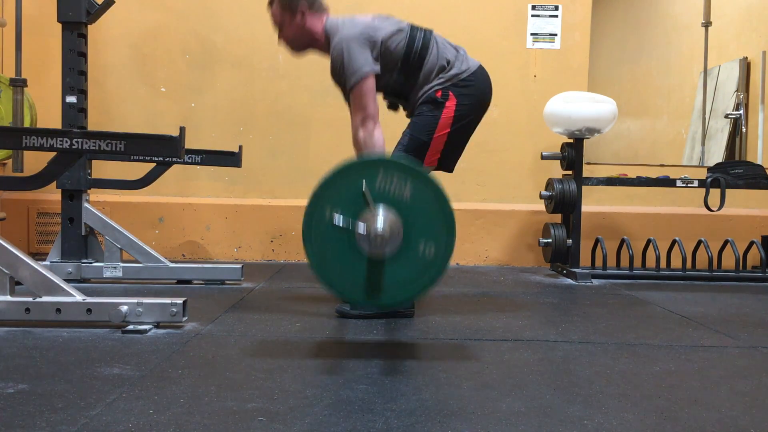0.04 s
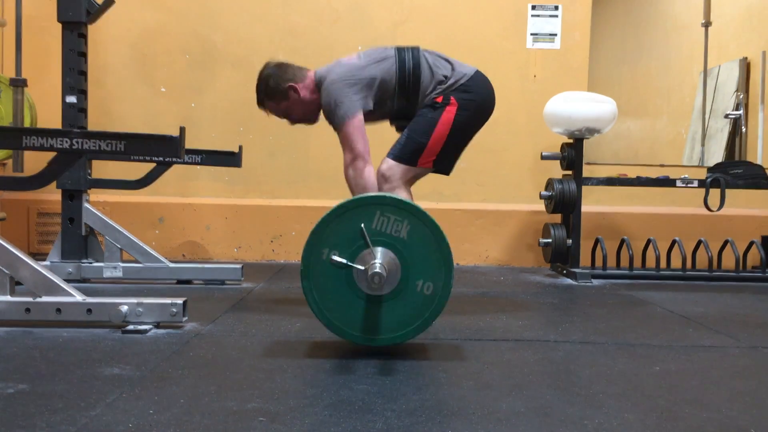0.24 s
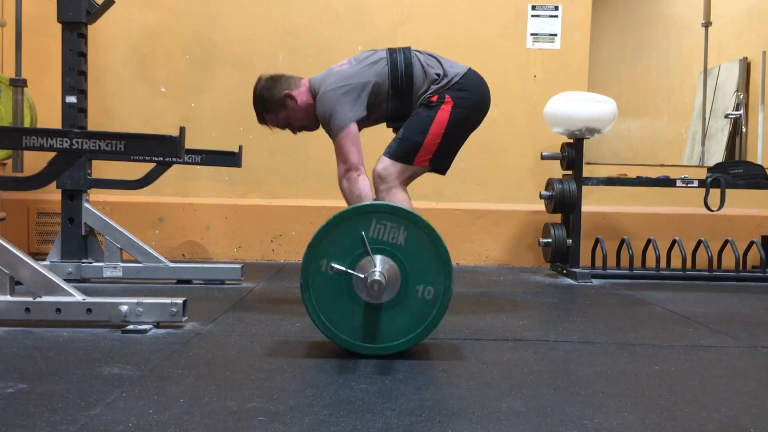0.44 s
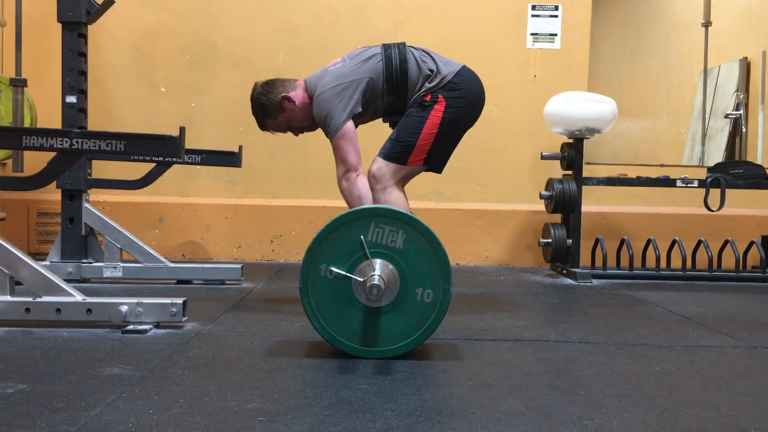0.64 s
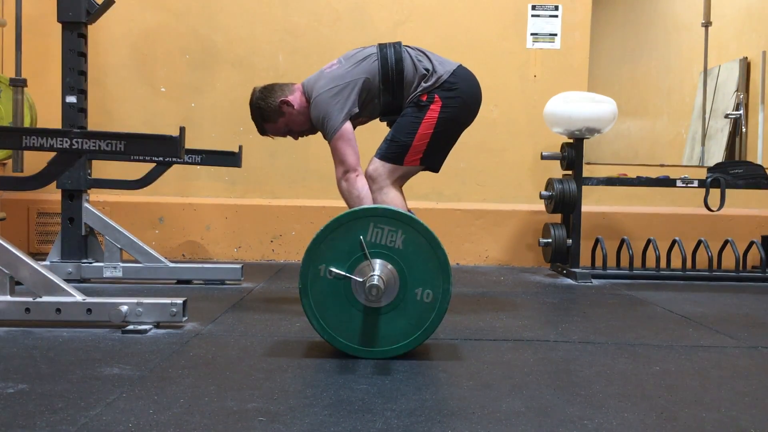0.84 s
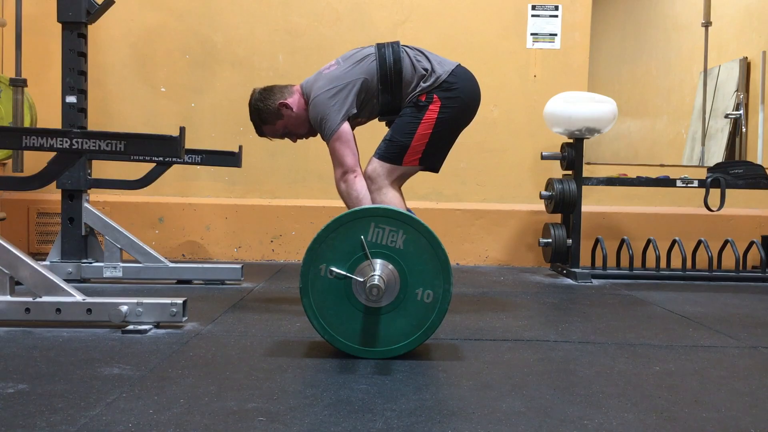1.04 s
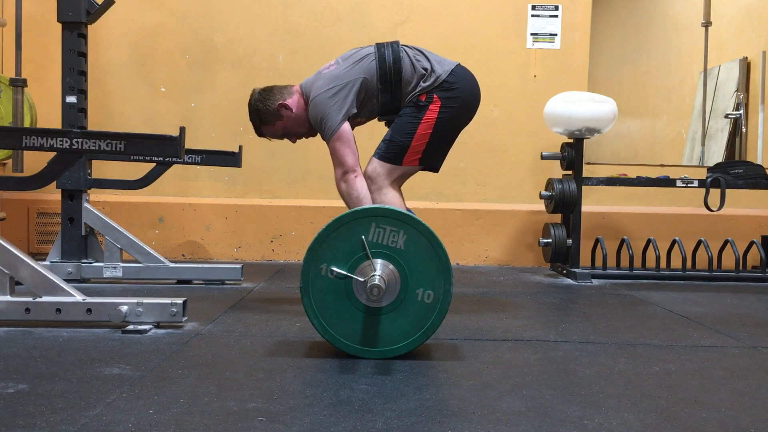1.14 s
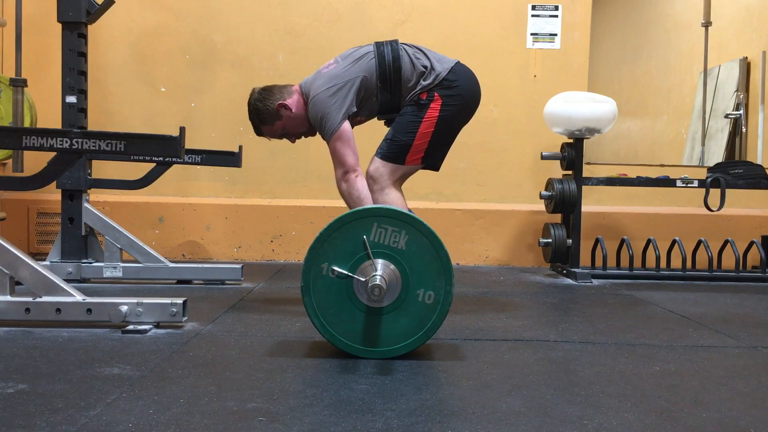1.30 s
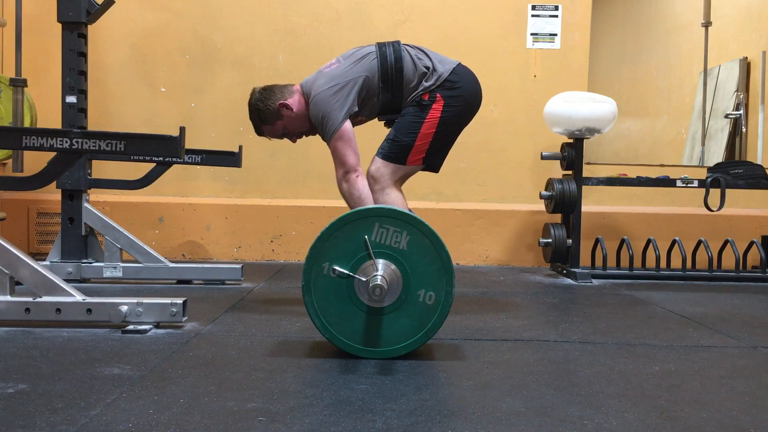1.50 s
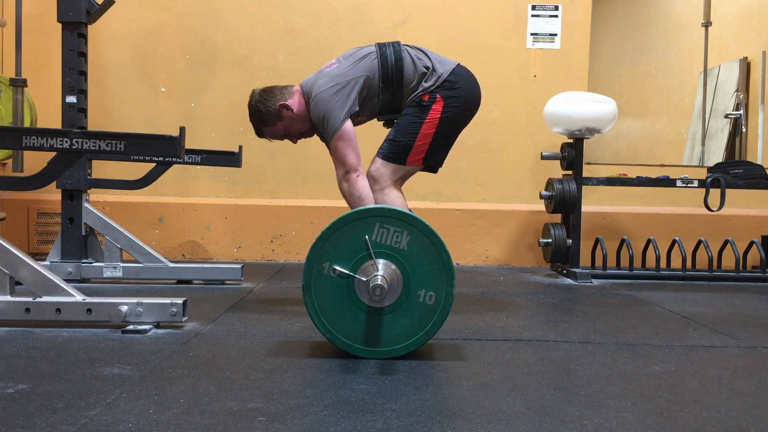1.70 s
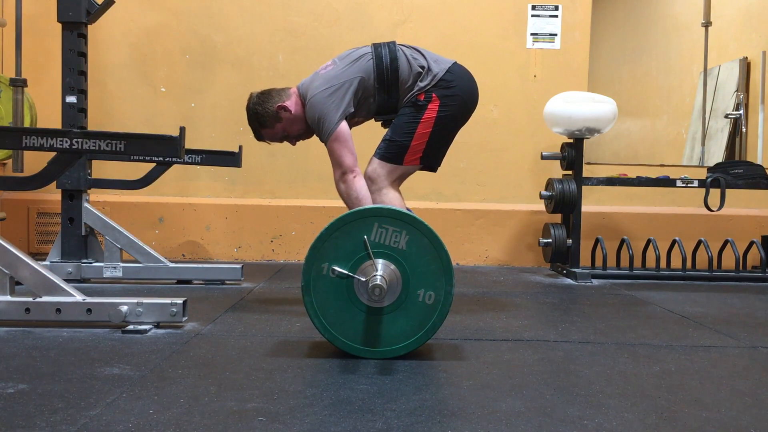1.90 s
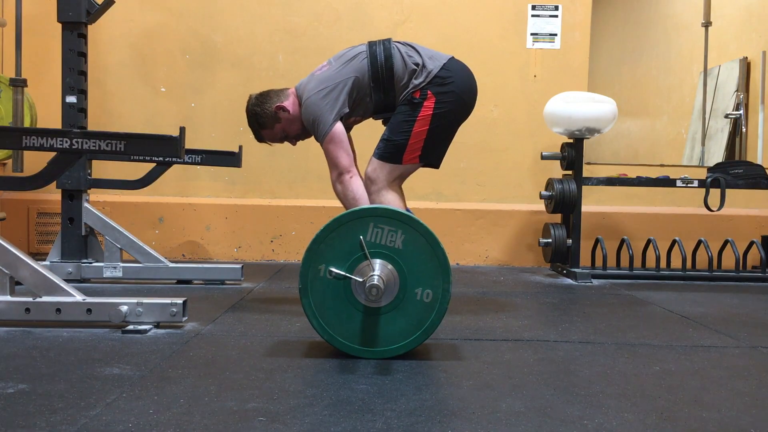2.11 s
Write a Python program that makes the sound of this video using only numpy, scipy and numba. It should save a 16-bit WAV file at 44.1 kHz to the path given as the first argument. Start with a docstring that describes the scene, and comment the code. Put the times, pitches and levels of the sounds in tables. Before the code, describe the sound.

A barbell slams onto floor mats, its rubber plates rattling as a large gym reverberates.

```python
"""A large gym, one microphone within direct earshot of a barbell dropped on the matted floor.
The rubber plates touch down one after another and rattle on their sleeves; plates and bar ring, the hall
reverberates and its lowest modes boom on, beating. Dull knocks and faint rustles follow as the load
settles. Ventilation rumbles underneath, and the recorder's limiter holds the blow down."""
import sys
import numpy as np
from scipy import signal
from scipy.fft import rfft, irfft
from scipy.io import wavfile
from numba import njit

SR = 44100
rng = np.random.default_rng(int(sys.argv[2]) if len(sys.argv) > 2 else 0)


def bounce(signal):
    """Save signal as a 16-bit WAV file at the path given by the first command-line argument."""
    frames = np.transpose(np.atleast_2d(signal))
    limited = np.clip(frames, -1, 1)
    pcm = np.round(limited * 32767).astype(np.int16)
    wavfile.write(sys.argv[1], SR, pcm)


N = 94815
TIME, BIN_HZ = np.arange(N) / SR, np.arange(N // 2 + 1) * SR / N
CONTACT_RISE_S = 0.00034


def undb(db):
    """Decibels to amplitude."""
    return 10 ** (np.asarray(db) / 20)


def along(hz, points, column=1):
    """One column of a table, read on a log-frequency axis."""
    table = np.array(points, float)
    return np.interp(np.log(hz + 1e-3), np.log(table[:, 0]), table[:, column])


def noise(db):
    """Noise of rms 1 with the given relative level at each frequency."""
    x = irfft(undb(db) * np.exp(2j * np.pi * rng.random(len(BIN_HZ))), N)
    return x / x.std()


def rise(seconds, start=0):
    """A smooth onset."""
    return 1 - np.exp(-(np.maximum(TIME - start, 0) / seconds) ** 2)


def fade(t60, start=0):
    """Silence, then an exponential decay of 60 dB in t60 seconds."""
    return (TIME >= start) * np.exp(-np.log(1000) * np.maximum(TIME - start, 0) / t60)


def ventilation():
    """Room tone: the steady noise of moving air."""
    # air spectrum: f/Hz, relative level/dB
    colour = [(25, -19), (50, 4), (80, 1.5), (130, -9), (220, -15), (380, -16), (550, -25.5), (1200, -23.5),
              (2500, -30.5), (5000, -39), (9000, -49.5), (15000, -58)]
    return undb(-50) * noise(along(BIN_HZ, colour))


def rumble():
    """A low rumble, already in the hall, dies away."""
    # rumble spectrum: f/Hz, relative level/dB
    colour = [(25, -27), (50, -12), (78, 1), (105, -8), (150, -19), (400, -30), (2000, -63.5)]
    return undb(-37.5) * noise(along(BIN_HZ, colour)) * fade(t60=2.2)


def ring_db():
    """The lift that the barbell's resonances give to each frequency."""
    # rubber plates (low, broad) and steel bar (high, narrow): f/Hz, width/Hz, lift/dB
    resonances = [(300.2, 138, 15.5), (555.3, 113, 10), (640, 99, 7), (750, 5.3, 4), (846, 4.7, 10.5),
                  (937, 60, 6.5), (1088, 17, 6.5), (1182, 45, 3), (1954, 50, 5.5), (2400, 30, 3.5),
                  (3040, 58, 5.5), (3430, 630, 5), (4110, 25, 6.5), (5750, 18, 9.5)]
    return sum(db / (1 + (2 * (BIN_HZ - hz) / width) ** 2) for hz, width, db in resonances)


def barbell():
    """Each contact cracks straight at the microphone, scatters off racks and floor and fills the hall."""
    # contacts of plates, floor and sleeves: t/s, level/dB
    contacts = [(0.236, -11), (0.2435, -3.5), (0.2476, -1.5), (0.2529, 0), (0.2638, 0), (0.2674, -4),
                (0.2761, -4), (.298, -10)]
    # spectrum of the direct crack: f/Hz, relative level/dB
    colour = [(30, -7), (70, 7), (150, 3), (220, -2.5), (320, 7), (450, 5.5), (600, -4.5), (1100, 0.5),
              (2300, -2.5), (3300, -4), (4500, -11.5), (5300, -16), (7500, -17.5), (12000, -19.5),
              (16000, -22)]
    direct = undb(-20.5) * fade(t60=0.0093)
    scatter = undb(-13.5) * fade(t60=0.29)
    envelope = rise(CONTACT_RISE_S) * (direct + scatter)
    out = np.zeros(N)
    for start, db in contacts:
        crack = noise(along(BIN_HZ, colour) + ring_db()) * envelope
        i = int(start * SR)
        out[i:] += undb(db) * (crack + hall())[:N - i]
    return out


def hall(bands=28, build_s=0.013):
    """Diffuse reverberation: every band dies at its own rate, the top treble first."""
    # the hall's answer to a blow: f/Hz, relative level/dB, t60/s
    response = [(20, -40, 1.6), (38, 6.5, 3.2), (55, 6, 0.93), (73.5, 19, 1.7), (93, 10.5, 2.62),
                (116, -1.5, 1.68), (154, 2.5, 1.83), (190, -4.5, 2.35), (400, -3.5, 2.41), (770, -3, 2.23),
                (1130, -5.5, 2.84), (2255, -5, 2.534), (3580, -11, 2.256), (4450, -12, 2.13),
                (4630, -15, 2.02), (6640, -16.5, 1.62), (7600, -24.5, 1.64), (9800, -18, 1),
                (10040, -23, 1.06), (16000, -27.5, 0.56)]
    spectrum = rfft(noise(along(BIN_HZ, response) + ring_db()))
    centres = np.geomspace(30, 16000, bands)
    tail = 0
    for hz, weights in zip(centres, np.eye(bands)):
        band = irfft(spectrum * np.interp(BIN_HZ, centres, weights), N)
        tail += band * fade(t60=along(hz, response, column=2))
    return undb(-14) * tail * (1 - np.exp(-TIME / build_s))


def clanks(t60=0.053):
    """The loose steel sleeves chatter against the bar in their bright resonances."""
    # sleeve strikes: t/s, level/dB
    strikes = [(0.2366, -28.5), (0.246, -25.5), (0.2644, -19.5)]
    # sleeve resonances: f/Hz, width/Hz, relative level/dB
    modes = [(3280, 420, 8), (5180, 210, -1.5), (6440, 520, -6.5)]
    power = sum(undb(db) ** 2 / (1 + (2 * (BIN_HZ - hz) / width) ** 2) ** 2 for hz, width, db in modes)
    return sum(undb(db) * noise(10 * np.log10(power)) * rise(CONTACT_RISE_S, start) * fade(t60, start)
               for start, db in strikes)


def boom(start=0.268, build_s=0.018):
    """The weight sets the lowest modes swinging; they beat against each other."""
    # modes of floor and hall: f/Hz, relative level/dB, t60/s
    modes = [(57.6, -10.1, 1.1), (59.15, -14.8, 4.8), (62.9, -10, .5), (69.1, -7.1, 1.6),
             (72.7, -11.6, 1.9), (90.4, -24, 1.5)]
    age = np.maximum(TIME - start, 0)
    swing = sum(undb(db) * np.sin(2 * np.pi * hz * age) * fade(t60, start) for hz, db, t60 in modes)
    return undb(1) * rise(build_s, start) * swing


def knocks(rise_s=0.0025):
    """The plates settle on the mat with soft, dull knocks that ring them again."""
    # knocks on the mat: t/s, level/dB, t60/s
    hits = [(.382, -11, 0.27), (1.012, -24, 0.36), (1.056, -27.5, 0.75)]
    # knock spectrum: f/Hz, relative level/dB
    colour = [(80, -26), (170, -11), (270, 1.5), (380, -17), (600, -12.5), (1200, -10), (2500, -22),
              (6000, -61)]
    spectrum_db = along(BIN_HZ, colour) + ring_db()
    return sum(undb(db) * noise(spectrum_db) * rise(rise_s, start) * fade(t60, start)
               for start, db, t60 in hits)


def rustles():
    """Faint bright rustles swell and die away in the hall as the load settles."""
    # rustles: t/s, level/dB, rise/s, t60/s
    swells = [(.45, -35, 0.073, 1.0), (.655, -44, 0.004004, 0.53), (1.35, -62, 0.094, 0.99)]
    # rustle spectrum: f/Hz, relative level/dB
    colour = [(2000, -23), (5000, -3), (9000, 0), (12000, -3), (16000, -9)]
    out = np.zeros(N)
    for start, db, rise_s, t60 in swells:
        envelope = np.clip((TIME - start) / rise_s, 0, 1) * fade(t60, start)
        out += undb(db) * noise(along(BIN_HZ, colour)) * envelope
    return out


@njit
def follow(x, attack_s, release_s):
    """The limiter's peak follower, quick to rise and slow to fall."""
    out, level = np.empty(len(x)), 0.
    for i in range(len(x)):
        gap = abs(x[i]) - level
        level += gap / (SR * (attack_s if gap > 0 else release_s))
        out[i] = level
    return out


def scene():
    """The drop over the quiet of the gym, in mono at the microphone."""
    return (barbell() + clanks() + boom() + knocks() + rustles() + ventilation() + rumble())[None, :]


def record(dry):
    """The recorder's limiter ducks the blow and recovers slowly; peaks are rounded, the top is cut."""
    limit_db, ceiling, top_hz = -9, 0.53, 15650
    peak = follow(dry[0], attack_s=0.006, release_s=0.89)
    held = dry / np.maximum(peak / undb(limit_db), 1)
    rounded = held / (1 + (held / ceiling) ** 4) ** (1 / 4)
    lowpass = signal.ellip(10, 0.2, 80, top_hz, fs=SR, output="sos")
    return signal.sosfilt(lowpass, rounded)


dry = scene()
out = record(dry)
bounce(out)
```